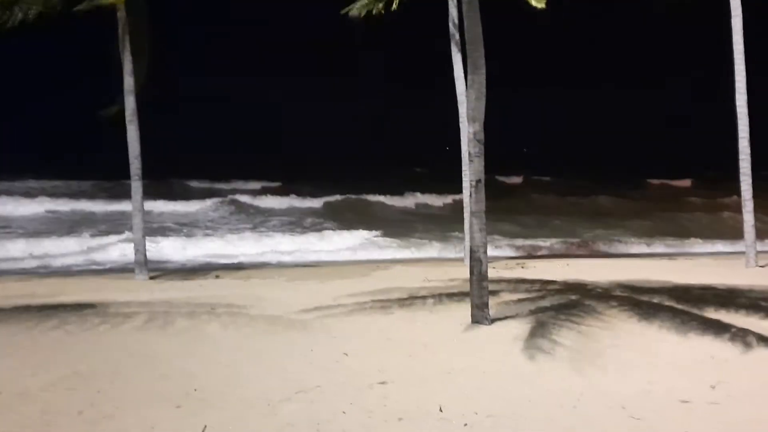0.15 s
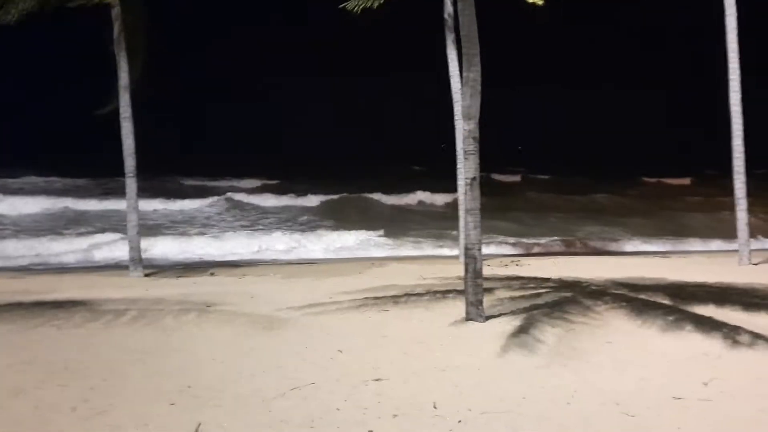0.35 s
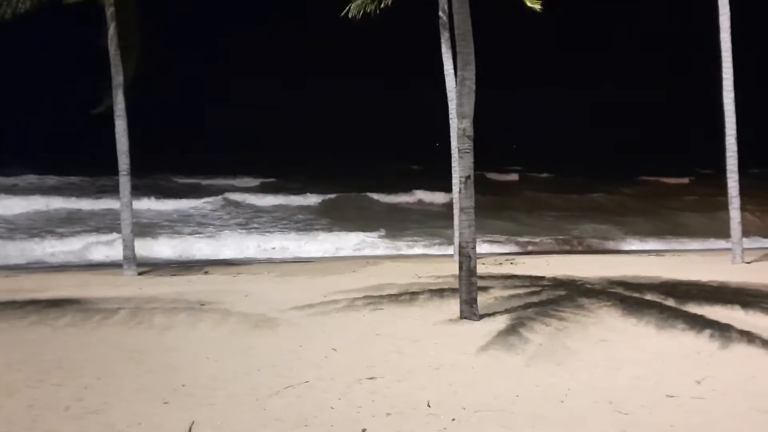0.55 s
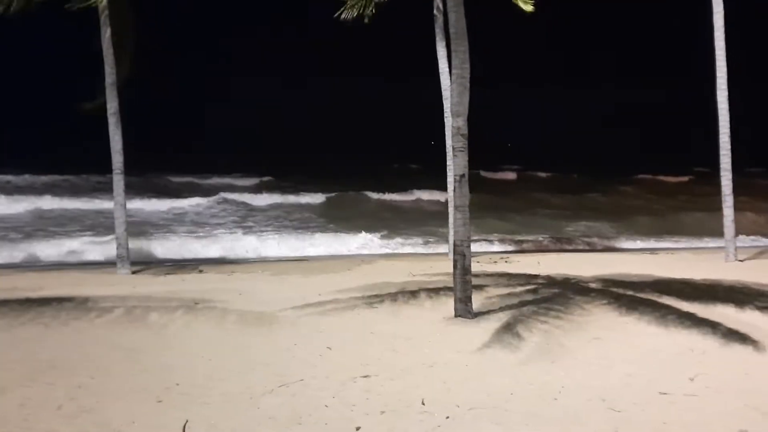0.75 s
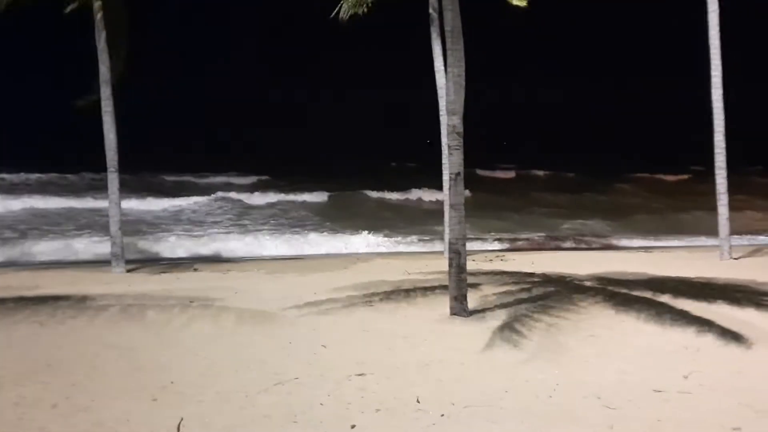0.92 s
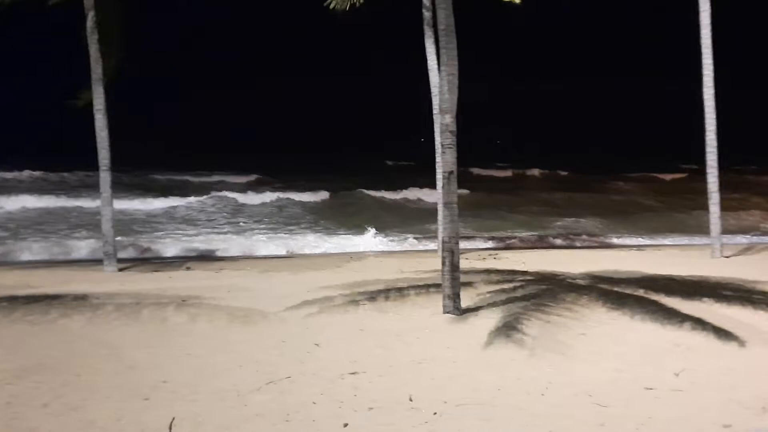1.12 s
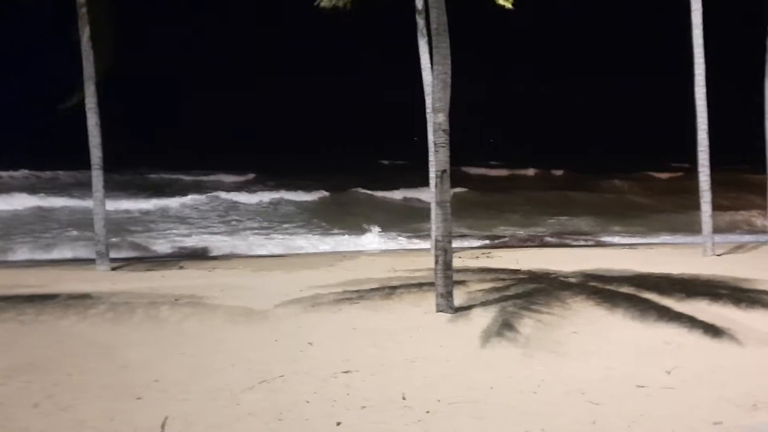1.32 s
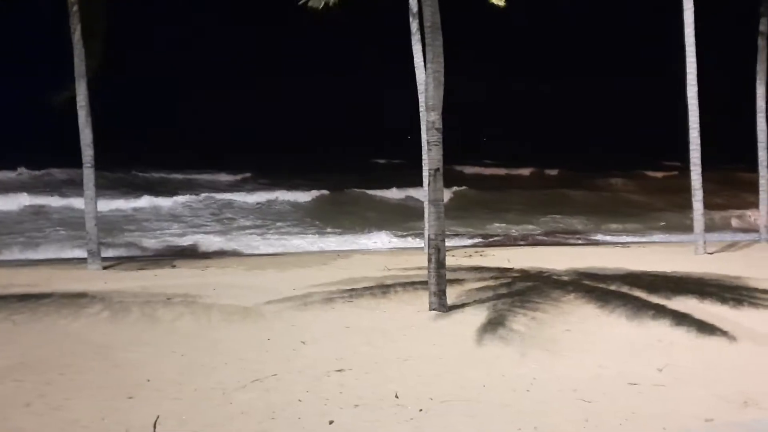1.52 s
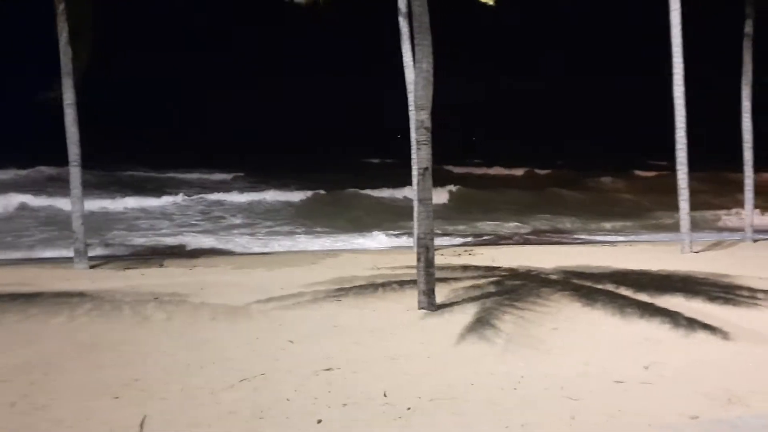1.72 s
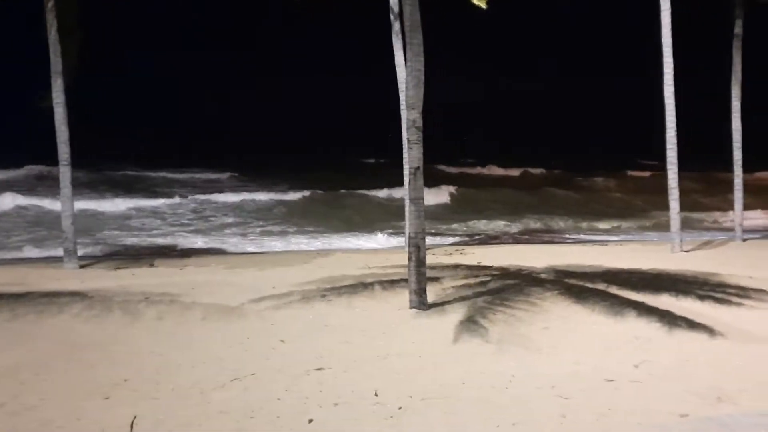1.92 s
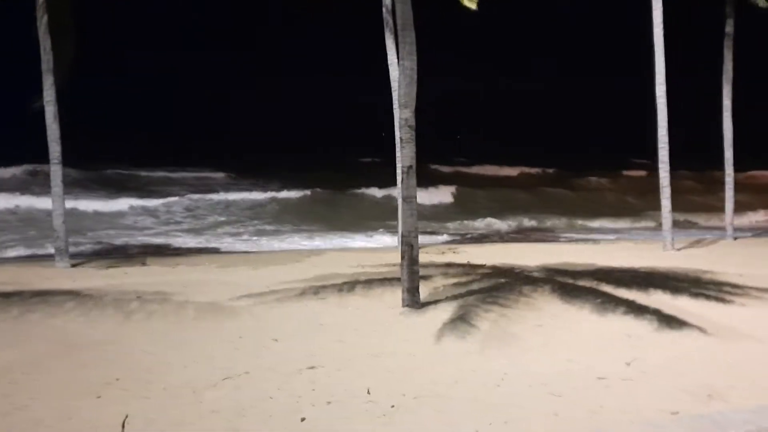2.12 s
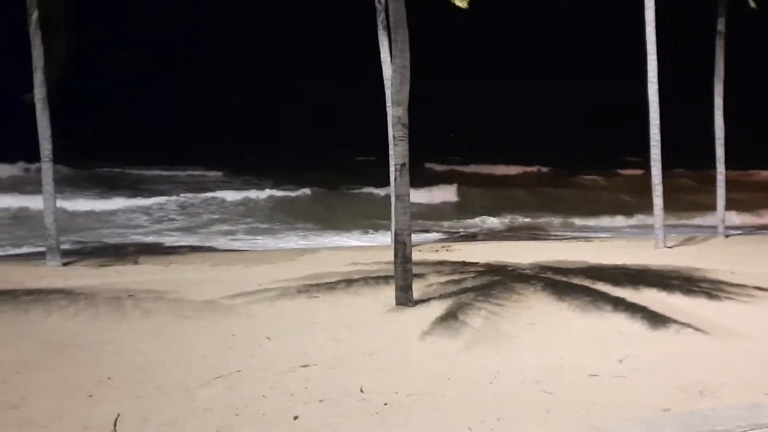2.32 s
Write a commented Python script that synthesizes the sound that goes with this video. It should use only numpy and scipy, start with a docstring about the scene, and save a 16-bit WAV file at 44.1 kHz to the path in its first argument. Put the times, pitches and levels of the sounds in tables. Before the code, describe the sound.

Wind buffets a microphone with hollow knocks and thumps, over steady surf on a sandy beach

```python
"""Wind buffets the two ports of a microphone: dense eddies knock on each with a hollow ring.
Gusts make the knocking louder and add a rasp of noise; single strong eddies thump, a slap and a ring
that sags in pitch. Under them the wind's low rumble, filtered noise, comes in short surges.
Behind it all surf washes up a beach: bands of noise make a low roar with the hiss of foam above it."""
import sys
import numpy as np
from scipy import signal
from scipy.fft import rfft, irfft
from scipy.io import wavfile
from scipy.ndimage import uniform_filter1d

SR = 44100
rng = np.random.default_rng(int(sys.argv[2]) if len(sys.argv) > 2 else 0)


def transcribe(signal):
    """Save signal, clipped to [-1, 1], as a 16-bit WAV file at the path in sys.argv[1]."""
    frames = np.atleast_2d(signal).T
    limited = np.clip(frames, -1, 1)
    pcm = np.round(limited * 32767).astype(np.int16)
    wavfile.write(sys.argv[1], SR, pcm)


N = 103635
T = np.arange(N) / SR


def from_db(db):
    """Decibels to gain."""
    return 10 ** (np.asarray(db) / 20)


def rms_one(x):
    """Scale to rms 1."""
    return x / np.sqrt(np.mean(x ** 2) + 1e-20)


def level(rows):
    """Gain over time, from rows of (time [s], level [dB])."""
    return from_db(np.interp(T, *np.transpose(rows)))


def at_hz(points, hz):
    """Read a spectrum in dB on a log-frequency axis."""
    f, db = np.transpose(points)
    return np.interp(np.log(hz + 1e-6), np.log(f), db)


def drift(rate):
    """Smooth random curve of rms 1 that changes about rate times a second."""
    step = 40  # samples between the points of the slow curve
    pole = np.exp(-2 * np.pi * step * rate / SR)
    settle = 2000  # points dropped while the filter settles
    noise = rng.standard_normal(N // step + settle + 2)
    slow = signal.lfilter([1], [1, -2 * pole, pole ** 2], noise)[settle:]
    return np.interp(np.arange(N) / step, np.arange(len(slow)), rms_one(slow))


def response(spectrum, size=8192):
    """Causal minimum-phase impulse response with the given spectrum, peak 1."""
    gain = from_db(at_hz(spectrum, np.fft.rfftfreq(size, 1 / SR)))
    cepstrum = irfft(np.log(gain))
    # Folding the cepstrum forward puts the energy as early as possible.
    cepstrum[1:size // 2] *= 2
    cepstrum[size // 2 + 1:] = 0
    h = irfft(np.exp(rfft(cepstrum)))[:size // 2]
    return h / np.abs(h).max()


def colour(x, spectrum):
    """Filter every channel with that response."""
    return signal.fftconvolve(x, response(spectrum)[None], axes=1)[:, :N]


def even(x, seconds):
    """Hold the running rms near 1."""
    size = max(int(seconds * SR), 2)
    power = uniform_filter1d(uniform_filter1d(x ** 2, size), size)
    return x / np.sqrt(np.abs(power) + 1e-12)


def surf():
    """Wash from all along the shore: roar and hiss swell apart, each band's level wavers at random."""
    # breaking water and foam: (frequency [Hz], relative level [dB])
    wash_spectrum = [(60, 1), (200, 5), (400, 0), (800, 0), (1200, -1.5), (1500, -3), (2050, -1.5),
                     (2900, -9.5), (4200, -10.5), (6400, -11.5), (7200, -15), (8600, -14.5), (9500, -19),
                     (10600, -19), (12000, -15.5), (13500, -16.5), (15500, -18.5)]
    # roar of the breakers: (time [s], level [dB])
    roar_level = [(0, -38), (.2, -40), (.4, -37), (.58, -41), (.84, -37), (1.1, -39.5), (1.33, -40),
                  (1.5, -41.5), (1.68, -42), (1.85, -41), (2.13, -41.5), (2.35, -39)]
    # hiss of the foam: (time [s], level [dB])
    hiss_level = [(0, -37.5), (.05, -40), (.18, -40.5), (.24, -37.5), (.42, -39.5), (.6, -40.5), (.84, -40),
                  (1.0, -40), (1.12, -39), (1.24, -42), (1.33, -40), (1.46, -43), (1.51, -40),
                  (1.56, -42.5), (1.67, -39.5), (1.83, -42.5), (1.89, -40), (2.0, -41), (2.26, -41),
                  (2.32, -37.5), (2.35, -39)]
    hiss_above_hz = 2650
    shared, lag_s = 0.18, 0.000657  # power share that reaches both ports, largest delay between them
    roar_waver_db, hiss_waver_db, wavers_per_s = .85, 1.25, 20
    gain_waver_db, gain_wavers_per_s = .75, 24

    roar_edges = np.geomspace(60, hiss_above_hz, 7)[:-1]
    hiss_edges = np.geomspace(hiss_above_hz, 17000, 15)
    edges = np.r_[roar_edges, hiss_edges]
    hz = np.fft.rfftfreq(N, 1 / SR)
    bins = rfft(rms_one(colour(rng.standard_normal((3, N)), wash_spectrum)))
    # Each narrow slice of the shared wash comes from its own direction.
    direction = rng.uniform(-1, 1, size=128)[(hz / SR * 250).astype(int)]
    delay = np.exp(-1j * np.pi * hz * lag_s * direction * [[1], [-1]])
    ports = np.sqrt(1 - shared) * bins[:2] + np.sqrt(shared) * bins[2] * delay

    roar, hiss = level(roar_level), level(hiss_level)
    out = 0
    for low, high in zip(edges, edges[1:]):
        band = irfft(ports * ((hz >= low) & (hz < high)), N)
        swell, waver_db = (hiss, hiss_waver_db) if low >= hiss_above_hz else (roar, roar_waver_db)
        out = out + band * swell * from_db(waver_db * drift(wavers_per_s))
    # The recorder's gain on the wash wavers over both ports at once.
    return out * from_db(gain_waver_db * drift(gain_wavers_per_s))


def rumble():
    """Low wind pressure that comes in short surges, with a different waveform at each port."""
    # low rumble of the wind: (frequency [Hz], relative level [dB])
    low_spectrum = [(12, -45), (25, -18), (42, -11.5), (65, -5.5), (85, 0.5), (120, -5.5), (170, -6.5),
                    (250, -14), (500, -46), (1500, -59)]
    # rumble between its surges: (time [s], level [dB])
    calm_level = [(0, -30.5), (.05, -63), (.18, -51), (.22, -39), (.35, -38), (.41, -44), (.48, -37),
                  (.62, -48), (.72, -42), (.87, -44), (.95, -34), (1.17, -39), (1.23, -28), (1.31, -45),
                  (1.38, -33.5), (1.6, -40.5), (1.78, -35), (2.05, -34.5), (2.12, -42), (2.28, -49),
                  (2.35, -55)]
    # surges: (time of the peak [s], level [dB])
    surge_rows = [(0.211, -24.5), (0.243, -29), (.267, -26), (.31, -30), (0.344, -32), (0.379, -27.5),
                  (.447, -26), (.487, -29), (.515, -30), (.56, -32), (0.629, -34), (.69, -33), (.722, -30),
                  (.785, -29), (0.813, -28), (0.908, -20.5), (.936, -30), (1.008, -33), (1.028, -26),
                  (1.065, -27), (1.1, -25.5), (1.153, -33.5), (1.205, -34), (1.23, -25), (1.253, -20.5),
                  (1.36, -32), (1.442, -30), (1.523, -33), (1.557, -24), (1.588, -27), (1.651, -31),
                  (1.695, -28), (1.717, -32), (1.76, -26), (1.835, -28.5), (1.861, -26), (1.89, -38),
                  (1.94, -27.5), (1.977, -37), (2.015, -30), (2.059, -27.5), (2.091, -31), (2.176, -29.5),
                  (2.233, -34), (2.278, -31), (2.301, -33.5)]
    surge_width_s, flutter_db = 0.0076, 2.5

    lumps = even(colour(rng.standard_normal((2, N)), low_spectrum), 0.02)
    surges = sum(from_db(db) * np.exp(-.5 * ((T - s) / surge_width_s) ** 2) for s, db in surge_rows)
    flutter = from_db(flutter_db * np.array([drift(36), drift(28)]))
    return lumps * np.hypot(surges, level(calm_level) * flutter)


def gust_shape(start, length):
    """Quick rise, hold, short release."""
    attack_s, release_s = .006, .006
    rise = np.clip((T - start) / attack_s + .5, 0, 1)
    return rise * np.exp(-np.maximum(T - start - length, 0) / release_s)


def buffeting():
    """Dense eddies ring each port separately; in gusts the air also rasps on each pressure peak."""
    # ring of a port struck by an eddy: (frequency [Hz], relative level [dB])
    port_ring = [(40, -27), (120, -25.5), (210, -17), (260, -4), (300, 3), (345, 0), (420, -0.5),
                 (550, -6.5), (780, -13), (1000, -20), (1500, -33), (2500, -51), (5000, -79.5)]
    # rasp of fast air over a port: (frequency [Hz], relative level [dB])
    rasp_spectrum = [(300, -43), (700, 16.5), (1000, 7), (1400, 5.5), (1900, 2.5), (2500, -9),
                     (3500, -14.5), (5000, -27), (10000, -56)]
    # wind on the ports between the gusts: (time [s], level [dB])
    breeze_level = [(0, -32.5), (.09, -46), (.17, -35.5), (.28, -28.5), (.4, -29), (.52, -35), (.58, -39.5),
                    (.67, -35), (.76, -28), (.86, -30.5), (.95, -28), (1.1, -31), (1.17, -29), (1.27, -26),
                    (1.32, -41), (1.37, -25.5), (1.48, -28), (1.57, -29.5), (1.67, -35), (1.76, -26.5),
                    (1.9, -34.5), (2.06, -35.5), (2.13, -37.5), (2.21, -43.5), (2.27, -32.5), (2.35, -53)]
    # gusts: (start [s], length [s], level of the knocks [dB], rasp against the knocks [dB])
    gust_rows = [(0.198, 0.019, -24.5, -22), (0.217, 0.019, -26.5, -13), (0.235, 0.033, -28, -23),
                 (0.324, 0.013, -22.5, -20), (0.437, 0.032, -16.5, -19.5), (0.491, 0.01, -21.5, -28),
                 (0.759, 0.061, -28, -25), (0.89, 0.016, -25, -27), (0.911, 0.035, -18, -21),
                 (0.96, 0.017, -16.5, -14), (0.99, 0.031, -17.5, -18), (1.196, 0.044, -20.5, -17),
                 (1.383, 0.019, -21.5, -13), (1.44, 0.015, -14, -11), (1.553, 0.015, -25.5, -20),
                 (1.752, .02, -29.5, -22), (1.927, 0.014, -31.5, -4), (2.015, 0.0093, -22, -6.5),
                 (2.036, 0.011, -31.5, -0.5)]
    eddies_per_s, eddy_spread_db = 800, 3.5
    flutter_db, flutter_per_s = 2.8, 35

    born = rng.random((2, N)) < eddies_per_s / SR
    eddies = born * from_db(eddy_spread_db * rng.standard_normal((2, N)))
    knocks = even(colour(eddies, port_ring), .033)
    breeze = level(breeze_level) * from_db(flutter_db * drift(flutter_per_s))
    gusts, rasp_level = 0, 0
    for start, length, db, rasp_db in gust_rows:
        shape = gust_shape(start, length)
        gusts = gusts + from_db(db) * shape
        rasp_level = rasp_level + from_db(db + rasp_db) * shape
    # Noise passes only while a knock pushes in the positive direction.
    bursts = rng.standard_normal((2, N)) * np.maximum(knocks, 0)
    rasp = rms_one(colour(bursts, rasp_spectrum))
    return knocks * np.hypot(breeze, gusts) + rasp * rasp_level


def thumps():
    """A strong eddy slaps one port, then the other; a hollow ring swells fast and sags as it dies."""
    # strong eddies: (time [s], ring level [dB], left against right [dB], pitch at the peak [Hz])
    strong_eddies = [(.068, -26.5, -3, 326), (0.149, -20, 0, 430), (0.207, -23, -10, 356),
                     (.271, -18.5, 10, 350), (0.314, -18, -5, 376), (.329, -6, 5, 340), (.501, -14, 1, 397),
                     (0.553, -21, 3, 312), (.773, -20, 8, 346), (.789, -16.5, 3, 388),
                     (.964, -7.5, -4, 348), (0.972, -14, 5, 347), (0.997, -10, 0, 370),
                     (1.008, -8.5, -8, 337), (1.07, -20, 0, 345), (1.102, -19.5, 12, 352),
                     (1.201, -13, -7.5, 455), (1.219, -10.5, 8, 370), (1.239, -9.5, 10, 346),
                     (1.253, -17, 15, 360), (1.435, -4, -3.5, 334), (1.508, -21, 8, 357),
                     (1.542, -18.5, -2, 426), (1.566, -21, -3, 483), (1.578, -23, -12, 407),
                     (1.644, -16.5, 1, 317), (1.713, -18.5, -2, 307), (1.772, -13, 4, 365),
                     (1.807, -25.5, 14, 395), (1.843, -23.5, -3, 375), (1.934, -27, -1, 410),
                     (2.022, -18.5, 0, 484), (2.17, -25, -3, 423)]
    # colour of the first push: (frequency [Hz], relative level [dB])
    slap_spectrum = [(60, -10), (250, -11.5), (520, 2.5), (720, 2), (1000, -9.5), (1800, -28.5),
                     (3000, -50), (6000, -75)]
    rise_s, decay_s, sag_per_s = 0.00163, 0.005, 20  # sag: share of the pitch lost per second
    slap_db = -5  # push against ring
    port_lag_s = 0.00079  # largest delay between the ports

    slaps, rings = np.zeros((2, N)), np.zeros((2, N))
    chances = rng.random((len(strong_eddies), 2))
    for (s, db, pan_db, hz), (lead, turn) in zip(strong_eddies, chances):
        for side, sign in enumerate((1, -1)):
            peak_s = s + sign * (lead - .5) * port_lag_s
            gain = from_db(db + sign * pan_db / 2)
            t = np.clip(T - peak_s, -.04, .04)
            rise = -.5 * (np.minimum(t, 0) / rise_s) ** 2
            decay = -np.maximum(t, 0) / decay_s
            swell = np.exp(rise + decay) * (t < .04)
            cycles = hz * t * (1 - sag_per_s * t / 2) + turn
            rings[side] += gain * swell * np.sin(2 * np.pi * cycles)
            slaps[side, int((peak_s - rise_s) * SR)] = gain
    return rings + from_db(slap_db) * colour(slaps, slap_spectrum)


def scene():
    """Surf behind, wind on the microphone."""
    return surf() + buffeting() + thumps() + rumble()


def record(dry):
    """The recorder eases off the deepest rumble, rounds the highest peaks and cuts the top."""
    low_cut_hz, cutoff_hz, peak_limit = 14, 15800, .9  # limit as a share of full scale
    low_cut = signal.butter(1, low_cut_hz, "high", fs=SR, output="sos")
    body = signal.sosfilt(low_cut, dry)
    rounded = body / (1 + (body / peak_limit) ** 6) ** (1 / 6)
    top_cut = signal.firwin(401, cutoff_hz, fs=SR)
    return signal.fftconvolve(rounded, top_cut[None], "same", axes=1)


dry = scene()
out = record(dry)
transcribe(out)
```